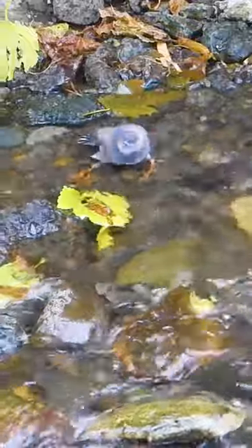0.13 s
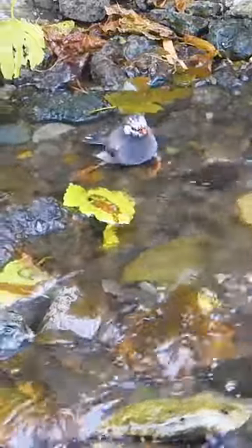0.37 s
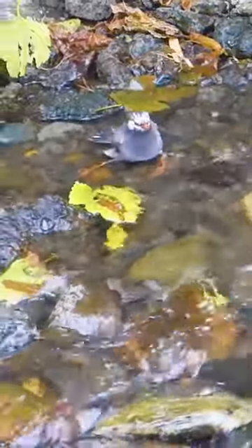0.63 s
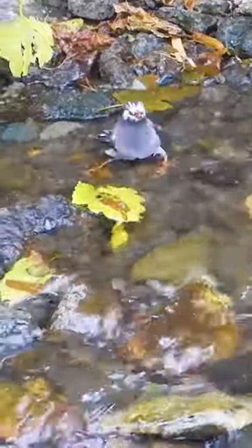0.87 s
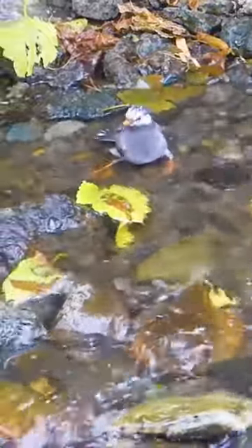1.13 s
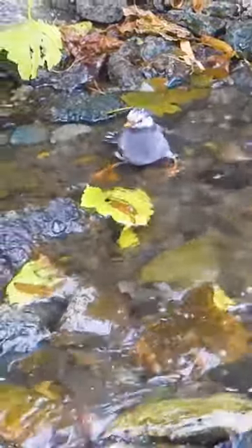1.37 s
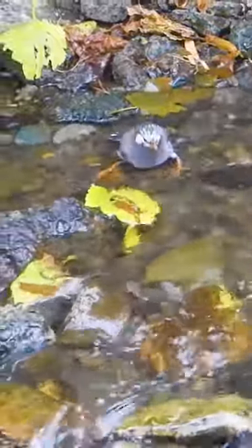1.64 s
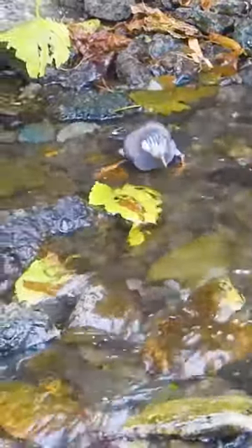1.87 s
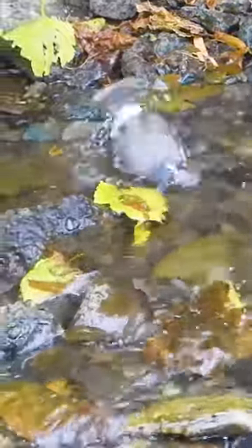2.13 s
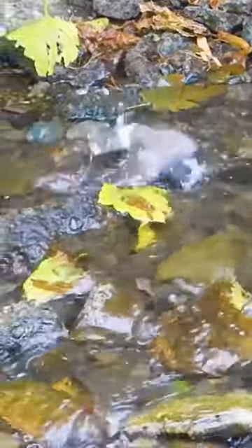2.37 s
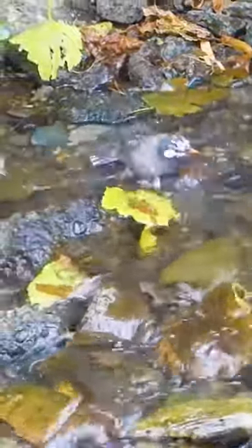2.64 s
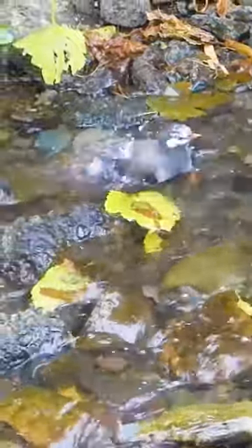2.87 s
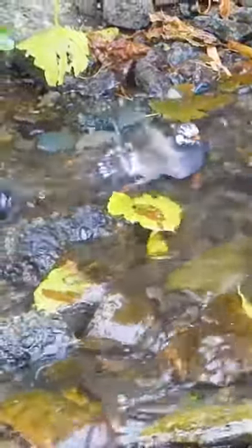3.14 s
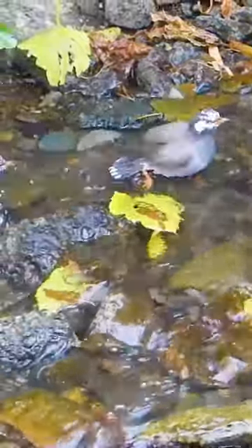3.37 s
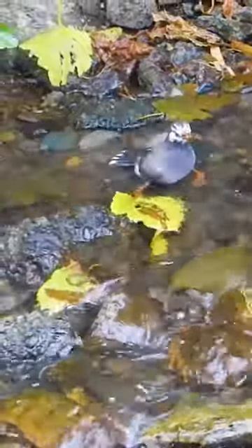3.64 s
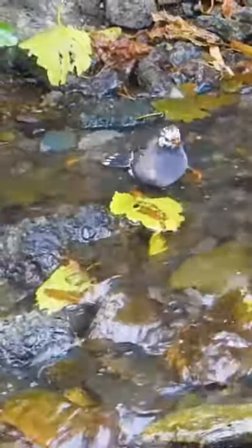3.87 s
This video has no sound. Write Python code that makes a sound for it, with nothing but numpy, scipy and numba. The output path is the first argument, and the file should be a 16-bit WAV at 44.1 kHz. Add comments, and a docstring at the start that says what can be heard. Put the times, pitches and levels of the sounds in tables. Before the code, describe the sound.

A shallow stream flows over stones, close and in stereo. Silence for under 0.1 seconds, then the water fades in quickly and runs steadily to 4 seconds, swelling very slightly. Low gurgling sits in front, with fine bright fizz leaning left. Rounded bubble plops stand out near 0.7, 1.2, 2.4 and 2.9 seconds; small droplets tick throughout, clustered around 1.1 seconds, with a sharper one near 3.5.

```python
"""Beside a shallow stream running over stones, close to a pair of microphones.
Air bubbles ring as fading sines on patchy noise: larger ones gurgle in front, a finer fizz comes from the left.
Some single bubbles stand out, and droplets tick as very short sines.
The sound fades in just after the start."""
import sys
import numpy as np
from scipy import signal
from scipy.fft import rfft, irfft, next_fast_len
from scipy.io import wavfile
from scipy.ndimage import uniform_filter1d, map_coordinates
from numba import njit

SR = 44100
rng = np.random.default_rng(int(sys.argv[2]) if len(sys.argv) > 2 else 0)


def elevation(decibels):
    """Turn decibel levels (scalar or array-like) into linear amplitude ratios."""
    levels = np.asarray(decibels, float)
    return 10 ** (levels / 20)


def wav_out(sig):
    """Save sig, one row per channel (or a flat mono array), as 16-bit PCM at SR to the path in sys.argv[1]."""
    wavfile.write(sys.argv[1], SR, np.round(np.clip(np.atleast_2d(sig).T, -1, 1) * 32767).astype(np.int16))


N = 176400  # samples

BUBBLE_START = 7.6  # how many times faster a bubble starts than it fades


def unit(x):
    """Scale to rms 1."""
    return x / np.sqrt(np.mean(x ** 2) + 1e-20)


def along(points, hz):
    """Read (Hz, value) points on a log frequency axis."""
    f, v = np.transpose(points)
    return np.interp(np.log(hz + 1), np.log(f + 1), v)


def curve(rows):
    """Read (seconds, value) rows at every sample."""
    return np.interp(np.arange(N) / SR, *np.transpose(rows))


def wobble(rate):
    """A smooth random curve through rate knots a second."""
    return map_coordinates(rng.standard_normal(400), [np.arange(N) * rate / SR])


def filtered(x, response):
    """Multiply the spectrum of x by a response of frequency."""
    m = next_fast_len(N + 8192)  # room for tails
    return irfft(rfft(x, m) * response(np.fft.rfftfreq(m, 1 / SR)), m)[..., :N]


@njit
def ring(n, start, step, size, cycles, rise, quick):
    """Sum of bubbles: soft start, fading sine, rising pitch; step = cycles a sample at the start."""
    out = np.zeros(n)
    for i in range(len(start)):
        life = cycles[i] / step[i]  # samples to fade by 1/e
        for k in range(min(int(4 * life), n - start[i])):
            u = k / life
            envelope = (1 - np.exp(-quick * u)) ** 2 * np.exp(-u)
            phase = 2 * np.pi * step[i] * k * (1 + rise * u / 2)
            out[start[i] + k] += size[i] * envelope * np.sin(phase)
    return out


def water(lo_hz, hi_hz, count, cycles, spread_db, rise, tilt_db, bubble_db, patchy_db):
    """Two unrelated streams before colouring: patchy noise with a swarm of bubbles."""
    crowd_hz, crowd_octaves, crowd_db = 1400, .6, 2.5  # bubbles near this pitch get a boost
    z = signal.stft(rng.standard_normal((2, N)), nperseg=512)[2]
    # random gains, smoothed over frequency and then time
    field = uniform_filter1d(rng.standard_normal(z.shape[1:]), size=7, axis=0)
    field = uniform_filter1d(field, size=8, axis=1)
    noise = signal.istft(z * elevation(patchy_db * unit(field)), nperseg=512)[1][:, :N]
    swarm = []
    for when, high, big, long in rng.random((2, 4, count)):
        hz = lo_hz + (hi_hz - lo_hz) * high
        octaves = np.log2(hz)
        crowd = crowd_db * np.exp(-((octaves - np.log2(crowd_hz)) / crowd_octaves) ** 2)
        size = elevation(spread_db * big + tilt_db * octaves + crowd)
        fade_cycles = cycles * (hz / 1000) ** 0.67 * (.5 + long)
        start = (when * N).astype(np.int64)
        swarm.append(ring(N, start, hz / SR, size, fade_cycles, rise, BUBBLE_START))
    return unit(noise) + elevation(bubble_db) * unit(np.array(swarm))


def placed(pair, colour, alike, lag_s):
    """Colour two streams and mix them to left and right with a likeness, the right lagging the left."""
    def turn(hz):
        return np.arccos(np.clip(along(alike, hz), 0, 1)) / 2

    def mid_side(hz):
        return elevation(along(colour, hz)) * [np.cos(turn(hz)), np.sin(turn(hz))]

    def lag(hz):
        return np.exp(1j * np.pi * hz * lag_s * np.array([[1], [-1]]))  # half to each ear

    mid, side = filtered(pair, mid_side)
    return unit(filtered(np.array([mid + side, mid - side]), lag))


def ticks(count):
    """Droplets landing, as very short sines: clear ones in the middle, lesser ones hard left or right."""
    # The clearest ticks. Each row: start in seconds, level in dB, pitch in Hz.
    clear_ticks = [(0.179, -28, 8000), (0.466, -30.5, 4410), (0.517, -31, 4350), (0.945, -28, 7200),
                   (1.066, -31, 6000), (1.099, -28.5, 5920), (1.112, -26, 7300), (1.136, -32, 7200),
                   (1.225, -27, 4000), (1.309, -29, 6080), (2.997, -30, 4190), (3.543, -17, 4480)]

    def tick(s, db, hz):
        cycles = np.full(len(s), 2.8)
        return ring(N, (s * SR).astype(np.int64), hz / SR, elevation(db), cycles, 0., 6)

    spray_db, spread_db, lo_hz, hi_hz = -44.5, 4.5, 4000, 9600
    spray = []
    for when, big, high in rng.random((2, 3, count)):
        db = spray_db - spread_db * np.log(1 - big)  # mostly faint, a few loud
        hz = lo_hz + (hi_hz - lo_hz) * high ** 2  # more of them low
        spray.append(tick(when * N / SR, db, hz))
    return tick(*np.transpose(clear_ticks)) + np.array(spray)


def plops():
    """Single bubbles that stand out in the middle: fading sines whose pitch rises slightly."""
    # The clearest bubbles. Each row: start in seconds, level in dB, starting pitch in Hz,
    # cycles to fade by 1/e.
    clear_bubbles = [(0.438, -20, 400, 5), (0.444, -29, 1690, 10), (0.47, -26, 663, 13),
                     (0.525, -28, 1027, 14), (0.692, -13, 1484, 5.6), (0.857, -29.5, 2210, 50),
                     (0.87, -20.5, 4840, 8.8), (0.95, -22, 826, 7.2), (0.998, -29, 2476, 54),
                     (1.046, -25, 4290, 10), (1.087, -31, 3596, 42), (1.181, -26, 860, 12),
                     (1.23, -31, 3070, 38), (1.242, -19, 1122, 17), (1.269, -27, 466, 8),
                     (1.317, -25, 2100, 12), (1.478, -22, 1574, 20), (1.551, -25, 2055, 22),
                     (1.652, -33, 2970, 68), (1.664, -29, 5630, 26), (1.752, -23, 328, 6.6),
                     (1.766, -26, 539, 7.3), (1.806, -21, 1675, 24), (2.384, -16, 1250, 5),
                     (2.515, -21, 1155, 21), (2.589, -19, 1017, 15), (2.737, -23, 524, 10),
                     (2.843, -29, 837, 28), (2.88, -16.5, 680, 5.8), (2.999, -25, 478, 6),
                     (3.041, -21, 624, 9.2), (3.05, -26.5, 965, 15), (3.05, -28, 1378, 11),
                     (3.401, -22, 1380, 9), (3.562, -23, 1506, 16), (3.583, -21, 1940, 8.2),
                     (3.651, -22, 890, 10), (3.664, -23, 301, 6.1), (3.843, -28, 930, 15),
                     (3.889, -26, 408, 17)]
    s, db, hz, cycles = np.transpose(clear_bubbles)
    rise = 0.0142  # share of the pitch gained over one fade
    rung = ring(N, (s * SR).astype(np.int64), hz / SR, elevation(db), cycles, rise, BUBBLE_START)
    low_hz = 215  # a steep roll-off below this
    return filtered(rung, lambda f: (1j * f / (low_hz + 1j * f)) ** 4)


def fizz():
    """Small high bubbles, briefly ringing, that reach the left ear first."""
    # Colour of the fizz. Each row: frequency in Hz, relative level in dB per Hz.
    colour = [(3000, -82), (3800, -15.5), (4050, -10), (4300, -6.5), (4800, -8.5), (5500, -11.5),
              (6200, -12.5), (7200, -16), (8500, -23.5), (10000, -30), (12000, -35.5), (13000, -43),
              (14000, -49), (15000, -47), (15500, -49)]
    # Left-right likeness. Each row: frequency in Hz, likeness from 0 to 1.
    alike = [(4000, 0.088), (4700, 0.59), (6300, 0.18), (7400, .12), (10000, 0.16), (12500, .06)]
    pair = water(3510, 14100, count=12000, cycles=3.9, spread_db=6.0, rise=0.019,
                 tilt_db=0.5, bubble_db=-5.5, patchy_db=0.8)
    return placed(pair, colour, alike, lag_s=.00012)


def gurgle():
    """Larger, lower bubbles that ring longer, nearly straight in front."""
    # Colour of the gurgle. Each row: frequency in Hz, relative level in dB per Hz.
    colour = [(25, -50), (55, -37), (85, -24.5), (100, -25), (145, -16), (180, -7.5), (208, 2), (260, -9),
              (340, -6.5), (430, -6.5), (480, -9), (620, -2), (880, -5.5), (1130, -1), (1400, -4),
              (1750, -2), (2050, -7), (2350, -7.5), (2700, -12), (3300, -8.5), (3700, -9), (3950, -47),
              (4300, -24), (5000, -90)]
    # Left-right likeness. Each row: frequency in Hz, likeness from 0 to 1.
    alike = [(60, 0.3), (120, 0.5), (200, 0.94), (800, 0.86), (1500, 0.73), (2200, 0.46), (2600, 0),
             (4000, 0.14)]
    pair = water(270.6, 4300, count=3600, cycles=23.33, spread_db=6.0, rise=0.0165,
                 tilt_db=0.4, bubble_db=-3.5, patchy_db=-0.5)
    return placed(pair, colour, alike, lag_s=.00002)


def stream():
    """The flow over stones: gurgle and fizz swell together and each on its own."""
    # Strength of the flow before its random swells. Each row: time in seconds, level in dB.
    flow = [(.12, -31.5), (.17, -31), (.25, -31), (.33, -28.5), (.42, -28), (.55, -28), (1, -28),
            (1.5, -27.5), (2, -27), (2.3, -28), (2.7, -27.5), (3.2, -27), (3.6, -26.5), (4, -27)]
    # Fizz against gurgle before their random swells. Each row: time in seconds, level in dB.
    fizz_level = [(.1, -6.5), (.8, -6.5), (1.1, -6), (1.6, -5.5), (2.1, -7.5), (3, -6.5), (4, -6.5)]
    shared_db = .5 * wobble(7.22) + 0.14 * wobble(29.36)
    low = gurgle() * elevation(0.47 * wobble(25.02))
    high = fizz() * elevation(curve(fizz_level) + 0.18 * wobble(12))
    return unit(low + high) * elevation(curve(flow) + shared_db)


def scene():
    """The stream with its single bubbles and droplets."""
    return ticks(count=400) + plops() + stream()


def low_pass(x):
    """Removes everything above the highest recorded frequency."""
    return signal.sosfilt(signal.butter(12, 15470, fs=SR, output="sos"), x)


def record(dry):
    """Two unequal microphones, then a quick fade-in out of silence."""
    # Microphone balance. Each row: frequency in Hz, left over right in dB.
    balance = [(60, -8), (120, -1), (240, 0), (470, 1), (940, -1), (1880, -2.5), (3750, 1), (7470, -1.5),
               (14900, 0.5)]
    # The fade-in, silent before its first row. Each row: time in seconds, gain in dB.
    fade = [(.078, -70), (.082, -45), (.1, -36), (.122, 2), (.13, -0.5)]
    halves = np.array([[.5], [-.5]])  # half up on the left, half down on the right
    heard = filtered(dry, lambda hz: elevation(along(balance, hz) * halves))
    begun = np.arange(N) > fade[0][0] * SR
    return low_pass(heard * elevation(curve(fade)) * begun)


dry = scene()
out = record(dry)
wav_out(out)
```